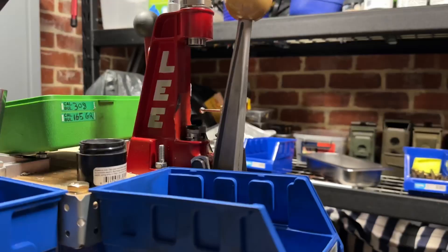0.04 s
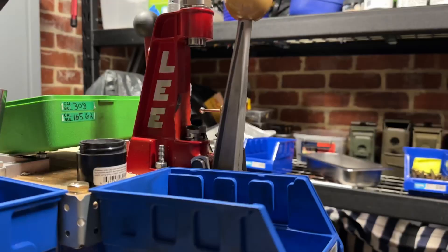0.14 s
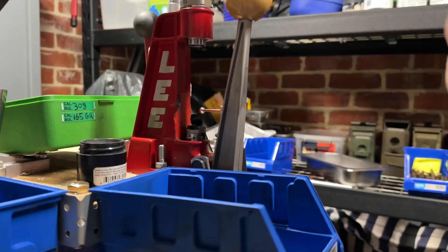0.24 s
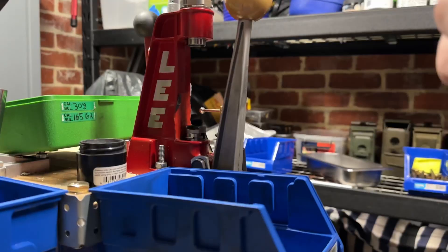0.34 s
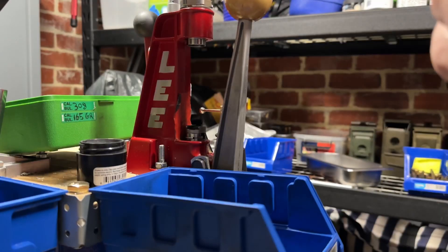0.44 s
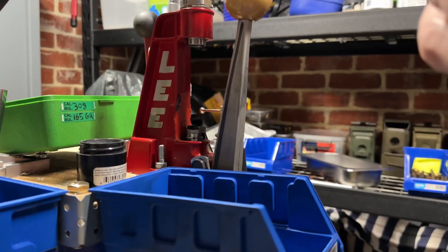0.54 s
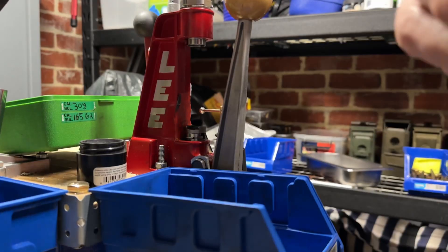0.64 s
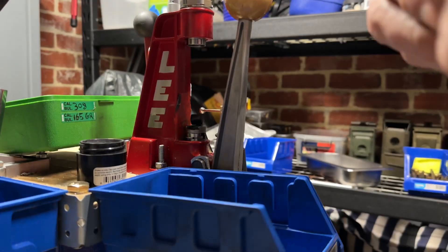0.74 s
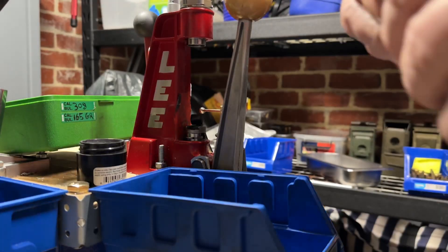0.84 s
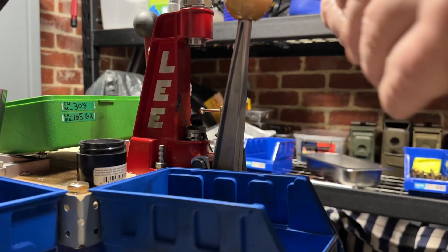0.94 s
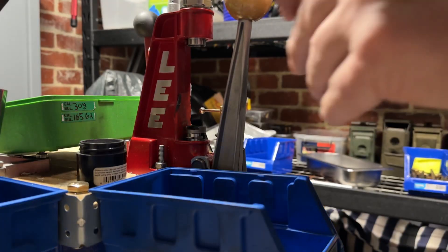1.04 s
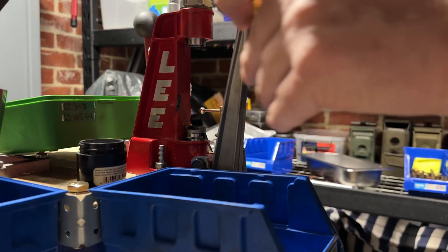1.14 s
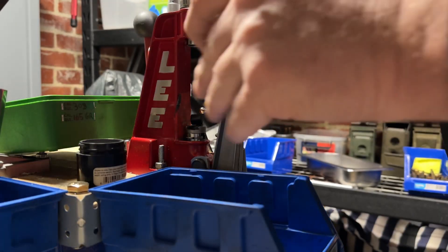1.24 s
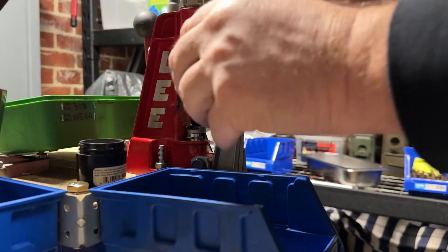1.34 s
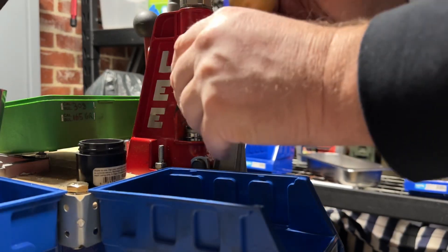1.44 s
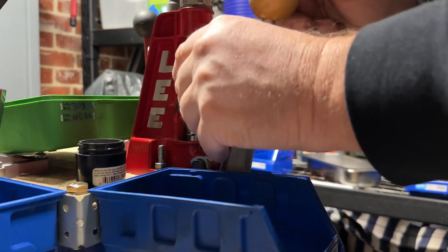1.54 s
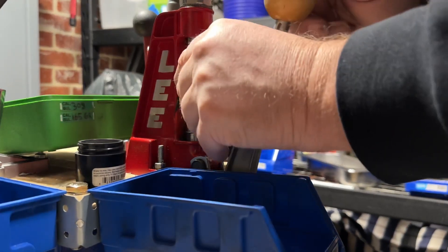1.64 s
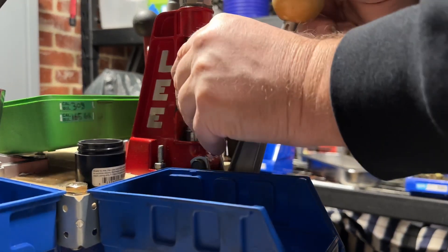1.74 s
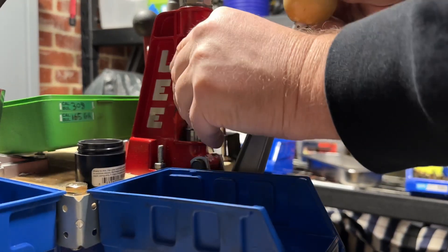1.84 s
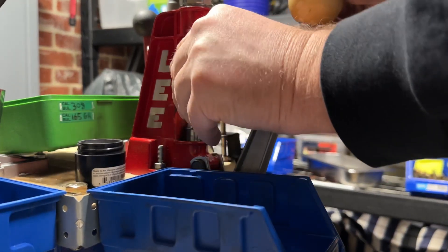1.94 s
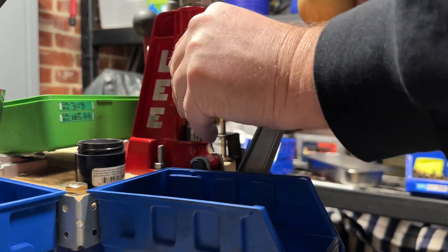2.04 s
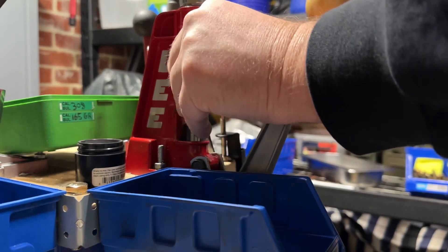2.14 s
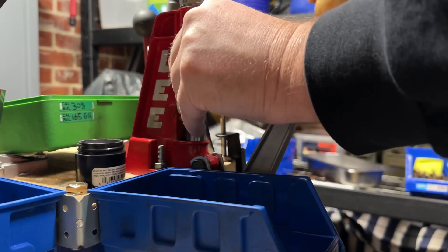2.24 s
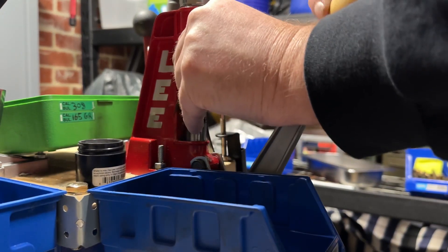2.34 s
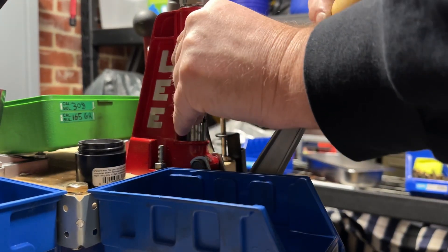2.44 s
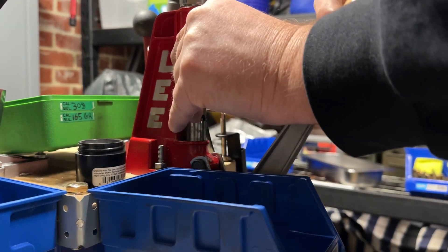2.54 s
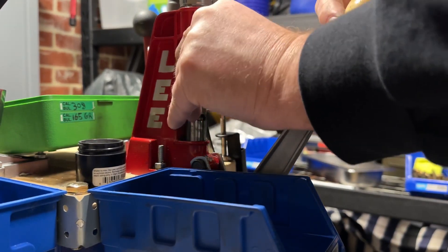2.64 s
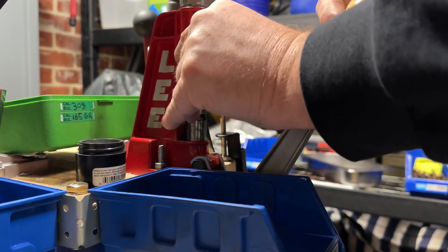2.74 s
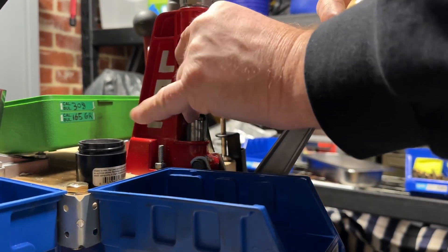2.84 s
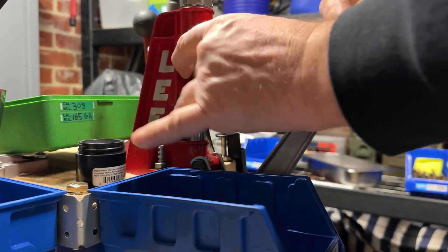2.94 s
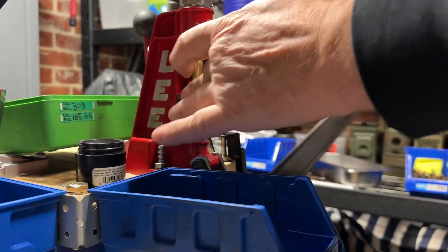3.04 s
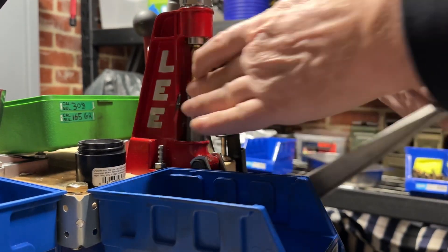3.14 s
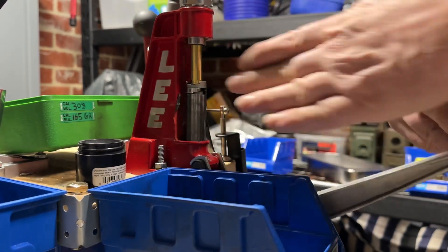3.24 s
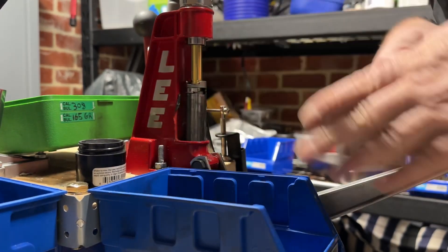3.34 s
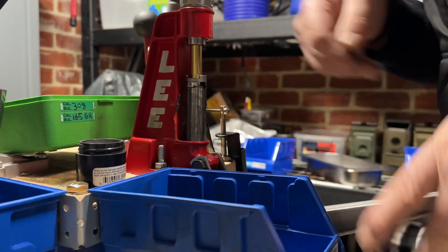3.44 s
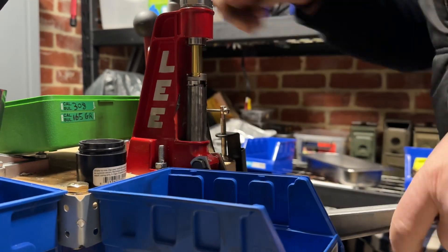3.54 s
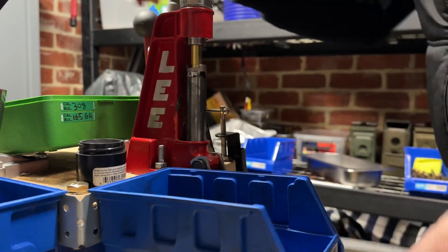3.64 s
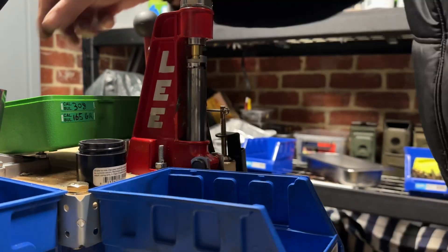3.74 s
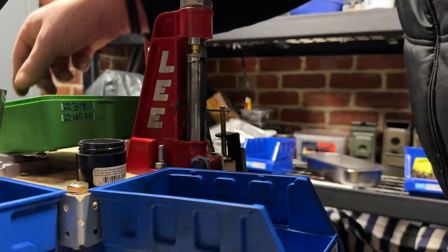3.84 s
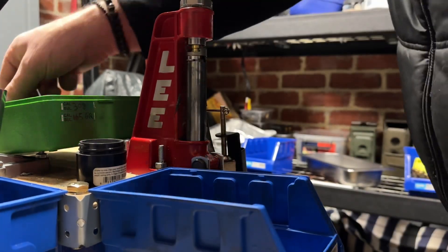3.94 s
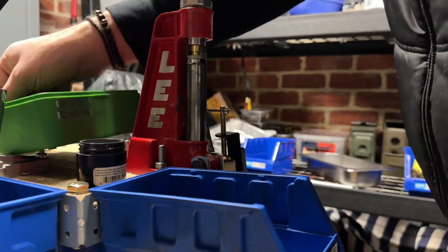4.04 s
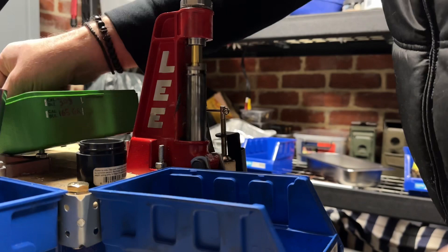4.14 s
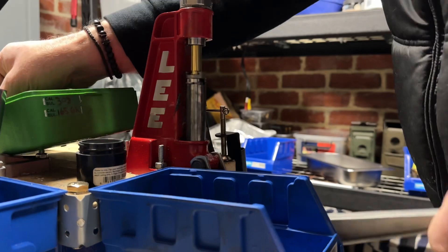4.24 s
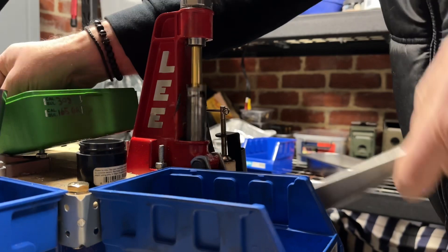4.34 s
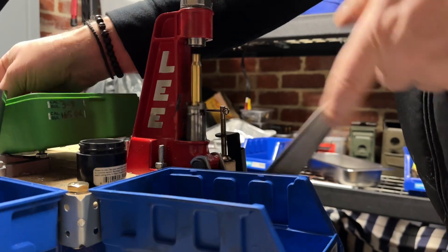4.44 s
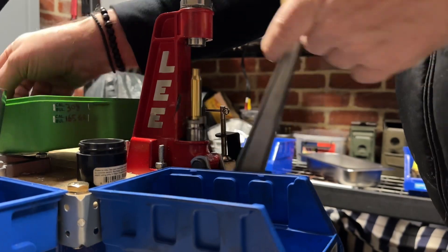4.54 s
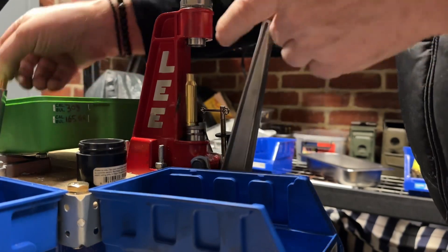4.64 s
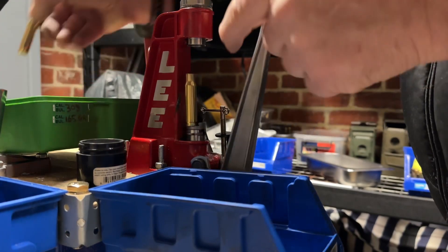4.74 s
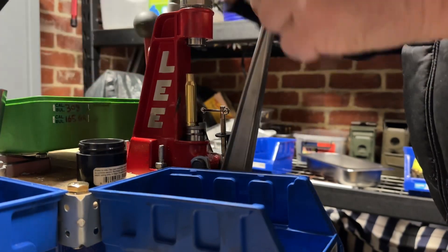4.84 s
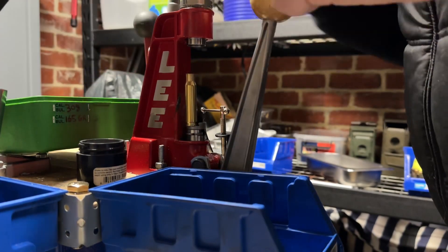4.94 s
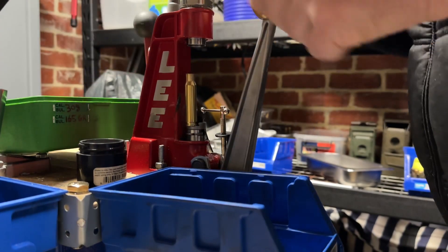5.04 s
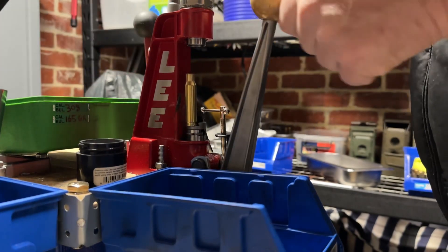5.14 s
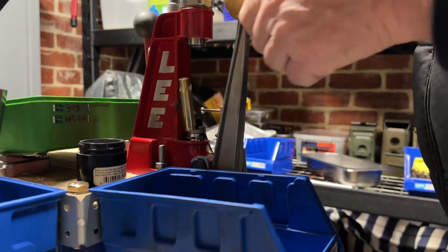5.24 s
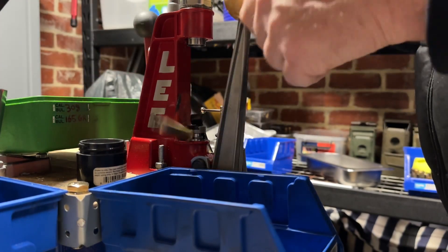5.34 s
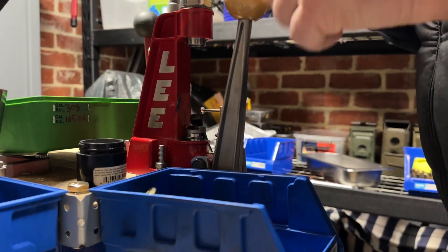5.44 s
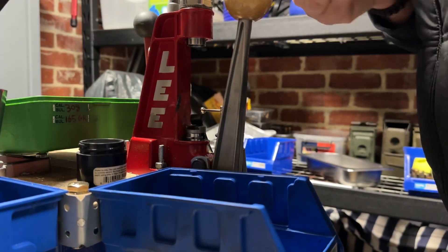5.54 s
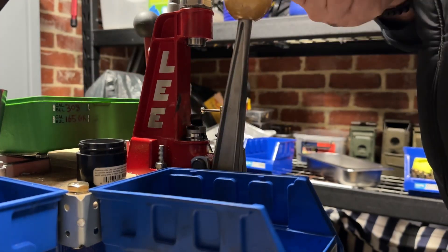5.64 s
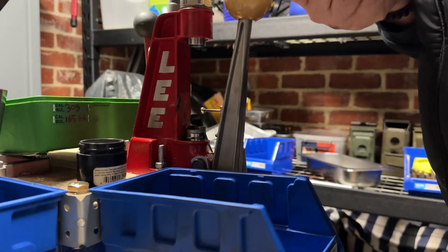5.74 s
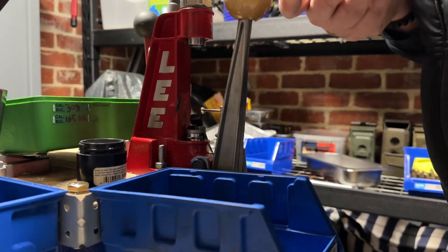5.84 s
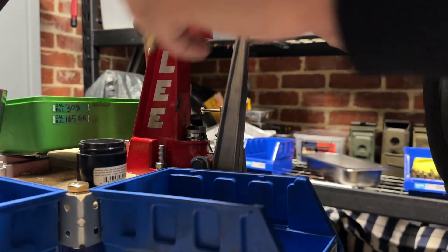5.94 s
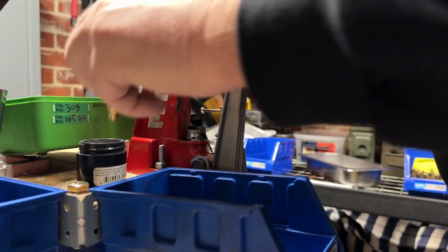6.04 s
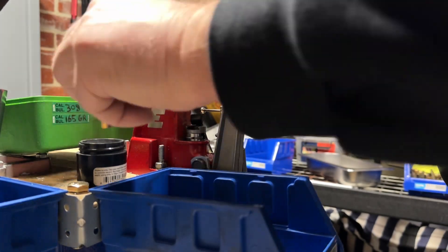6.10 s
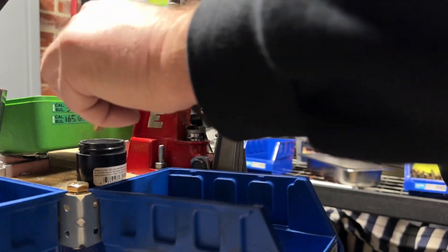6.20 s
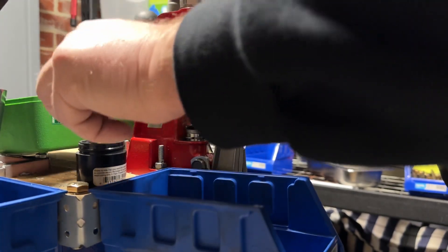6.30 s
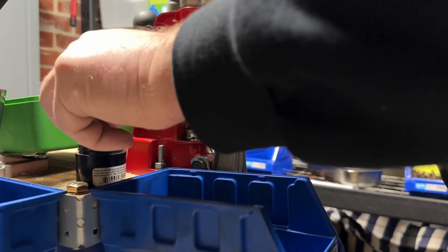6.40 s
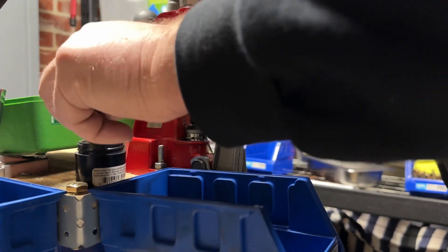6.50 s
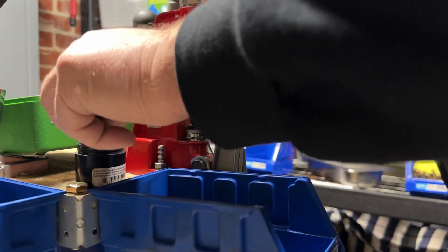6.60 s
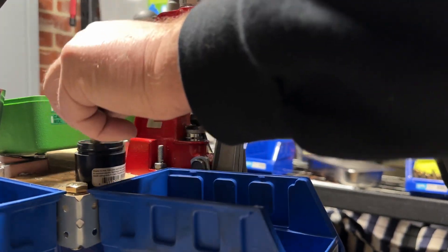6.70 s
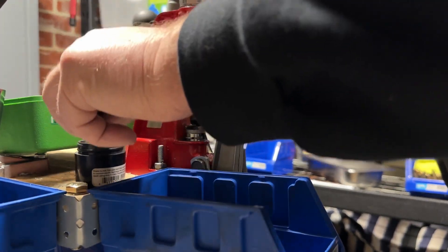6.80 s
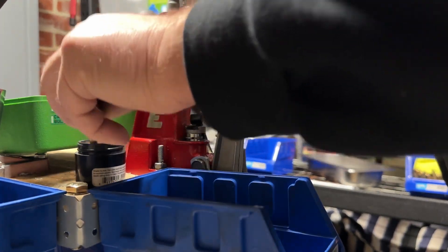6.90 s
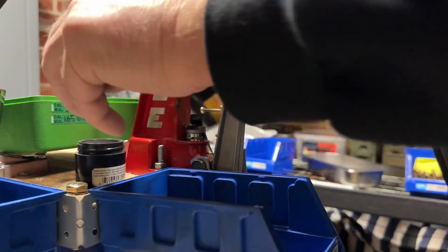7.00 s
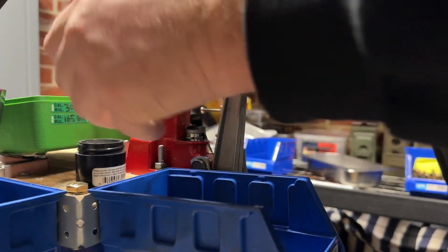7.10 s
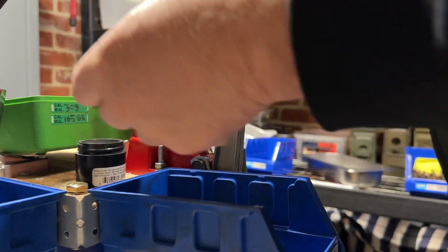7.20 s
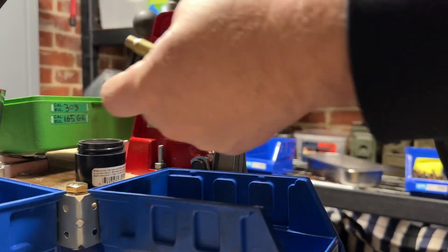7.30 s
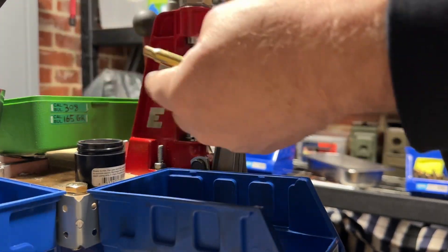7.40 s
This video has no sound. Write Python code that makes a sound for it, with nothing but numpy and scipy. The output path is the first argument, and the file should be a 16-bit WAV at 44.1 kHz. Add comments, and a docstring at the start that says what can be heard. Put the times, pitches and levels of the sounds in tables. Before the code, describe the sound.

A sleeve swishes, steel parts tick on a hand press, brass cases rattle in a tray, then one rings and bounces into a plastic bin.

```python
"""Work at a reloading press in a small brick workshop, heard close up over still air and a faint whine.
First a jacket swishes, from rubbed-fibre noise; then steel ticks, as noise bursts over ringing frame modes.
The ram groans as a narrow hum, a hand rummages in a tray of brass cases, and one case rings in beating pairs.
The lever hits its stop and rings, and the case bounces to rest in a plastic bin of swinging, ringing walls.
Softer handling and sleeve swishes follow."""
import sys
import numpy as np
from scipy import signal
from scipy.fft import rfft, irfft
from scipy.io import wavfile
from scipy.ndimage import uniform_filter1d

SR = 44100
rng = np.random.default_rng(int(sys.argv[2]) if len(sys.argv) > 2 else 0)


def master_out(mix):
    """Clip the mix to full scale and print it as 16-bit PCM to the path in sys.argv[1]."""
    frames = np.transpose(np.atleast_2d(mix))
    ceiling = np.clip(frames, -1, 1)
    pcm = np.round(ceiling * 32767).astype(np.int16)
    wavfile.write(sys.argv[1], SR, pcm)


N = 329102
T = np.arange(SR // 2) / SR  # time within one blow (s)
CLOCK = np.arange(N) / SR  # time through the scene (s)


def amp(db):
    """Decibels to gain."""
    return 10 ** (np.asarray(db) / 20)


def evened(x):
    """Scales to rms 1."""
    return x / np.sqrt(np.mean(x ** 2) + 1e-20)


def crested(x, size=176):
    """Scales the loudest few milliseconds to rms 1."""
    power = (x ** 2).mean(0)
    return x / np.sqrt(uniform_filter1d(power, size).max() + 1e-20)


def read(points, hz):
    """Reads a table on a log-frequency axis."""
    f, value = np.transpose(points)
    return np.interp(np.log(hz + 1), np.log(f + 1), value)


def add(mix, s, sound):
    """Adds a stereo sound at time s."""
    part = mix[:, max(round(s * SR), 0):][:, :sound.shape[1]]
    part += sound[:, :part.shape[1]]


def colour(x, spectrum, size=2048):
    """Causal (minimum-phase) filter with the given spectrum."""
    log_gain = np.log(amp(read(spectrum, abs(np.fft.fftfreq(size, 1 / SR)))))
    taps = np.fft.ifft(np.exp(np.conj(signal.hilbert(log_gain)))).real
    return signal.oaconvolve(x, taps[None], axes=1)[:, :x.shape[1]]


# likeness of diffuse sound at the two microphones: f/Hz, left-right correlation/1
STEREO_LIKENESS = [(50, 1), (150, 0.92), (400, 0.75), (900, 0), (2000, 0), (16000, 0.5)]


def diffuse(count):
    """White noise at two microphones, most alike in the bass."""
    a, b = rfft(rng.standard_normal((2, count)))
    same = np.clip(read(STEREO_LIKENESS, np.fft.rfftfreq(count, 1 / SR)), -1, 1)
    right = same * a + np.sqrt(1 - same ** 2) * b
    return irfft(np.array([a, right]), count)


def flutter(count, grain_db, size):
    """Gain that wanders at random, as contacts catch and let go."""
    return amp(grain_db * evened(uniform_filter1d(rng.standard_normal(count), size)))


def resonate_twice(x, hz, width):
    """Two equal resonances of peak gain 1 in a row, each of the given width in Hz."""
    b, a = signal.iirpeak(hz, hz / width, fs=SR)
    return signal.lfilter(b, a, signal.lfilter(b, a, x))


def burst(spectrum, t60, scatter, attack=.0002, chatter_db=4, size=30):
    """A brief chatter of contact: one shared wave plus scatter from things near by."""
    wave = rng.standard_normal(len(T)) + scatter * diffuse(len(T))
    wander = np.tanh(evened(uniform_filter1d(rng.standard_normal(len(T)), size)))
    chatter = amp(chatter_db * wander)
    onset = 1 - np.exp(-(T / max(attack, .0001)) ** 2)
    decay = amp(-60 * T / max(t60, .001))
    return colour(wave * chatter * onset * decay, spectrum)


def ring(modes, spread):
    """Decaying modes of a body; every blow excites them in another balance and phase."""
    hz, db, t60 = np.transpose(modes)[:, :, None]
    db = db + 2 * rng.standard_normal(db.shape)
    # spread: how far each mode's phase differs between the microphones (rad)
    phase = 2 * np.pi * rng.random(hz.shape) + spread * rng.standard_normal((2, *hz.shape))
    partials = amp(db - 60 * T / t60) * np.sin(2 * np.pi * hz * T + phase)
    return crested(partials.sum(1) * (1 - np.exp(-T / 0.0042)))


def focused(modes, hz, focus_db):
    """A blow favours the modes near its own pitch; the others lose focus_db an octave."""
    return [(f, db - focus_db * abs(np.log2(f / hz)), t60) for f, db, t60 in modes]


def flex(hz, rise, lag):
    """A panel swings for a few cycles, widest after rise seconds; the right hears it lag seconds early."""
    t = T + np.array([[0], [lag]])
    envelope = (t / rise) ** 2 * np.exp(-2 * t / rise)
    return crested(envelope * np.sin(2 * np.pi * hz * t))


def swell(s, rise, fall, shape=1.3):
    """A movement gathers speed until time s, then slows (shape 1 = pointed swell, 2 = bell)."""
    u = (CLOCK - s) / np.where(CLOCK < s, max(rise, .005), max(fall, .005))
    return np.exp(-np.minimum(abs(u), 10) ** shape)


# steel parts and fingers on the press:
# t/s, relative body level/dB, snap level/dB, strongest pitch f/Hz, body t60/s
PRESS_KNOCKS = [(1.272, -24.5, -49, 1207, 0.067), (1.297, -31.5, -44.5, 1050, 0.036),
                (1.659, -40.5, -46, 710, 0.13), (1.739, -33, -50, 1510, 0.03), (1.795, -45, -75, 1500, .02),
                (1.851, -42, -77, 1500, .03), (1.962, -32, -70, 1490, 0.022),
                (2.047, -42, -68, 1305, 0.084), (2.281, -28.5, -56, 720, 0.053),
                (2.298, -33, -47.5, 1150, 0.038), (2.54, -27.5, -44, 1450, 0.06),
                (2.615, -41, -80, 540, .06), (2.752, -48, -86, 515, 0.059),
                (3.101, -52, -46.5, 1960, 0.053), (3.15, -44, -38.5, 2950, 0.053),
                (3.576, -41, -52, 766, .06), (3.643, -32.5, -54, 680, 0.04),
                (3.909, -39.5, -71, 744, 0.023), (3.948, -36, -52, 1246, .02), (4.184, -41, -41, 430, .12),
                (4.347, -30, -44, 420, 0.022), (4.454, -29, -53.5, 1560, .025),
                (4.517, -22.5, -21, 2960, 0.035), (4.552, -23, -21, 2943, 0.08),
                (4.572, -32, -29, 2950, .09), (4.637, -28, -75, 1400, .02),
                (5.221, -26.5, -43, 1810, 0.023), (5.227, -17, -44, 650, 0.024),
                (6.025, -45, -66, 1030, 0.019), (6.085, -45.5, -78, 640, .025),
                (6.340, -39, -59, 410, .035), (6.549, -58, -67, 540, 0.025), (6.612, -52, -63, 640, 0.041),
                (6.659, -56.5, -85, 410, 0.05), (6.805, -48, -66.5, 491, 0.038),
                (6.824, -55, -69, 412, 0.044), (6.872, -59.5, -72, 452, 0.044)]
# spectrum of steel contact, also under sliding fingers: f/Hz, level/dB
STEEL_SPECTRUM = [(150, -16.5), (350, -9), (600, 1.5), (1200, -2), (1750, 0), (2800, -12), (5000, -16.5),
                  (9000, -39)]
# spectrum of the bright snap of any hard contact: f/Hz, level/dB
SNAP_SPECTRUM = [(1200, -25), (3000, 7.5), (4500, 1.5), (7000, 3.5), (10500, -7), (16000, -4)]
# ringing of the press frame: f/Hz, relative level/dB, t60/s
FRAME_MODES = [(402, -3, .3), (497, -3, .2), (707, 0, .2), (810, -6, .16), (1010, -4, .18), (1135, -4, .2),
               (1203, -2, .2), (1300, -6, .3), (1515, 0, .18), (1730, -2, .14), (1900, -4, .14)]
# side the hand works on: t/s, left minus right level/dB
HAND_SIDE = [(1.3, -4.5), (1.66, 0.5), (2.5, 0.5), (3.15, -1.5), (5.3, 0.5), (6.3, 3)]


def press_knocks(centre_hz, follow, attack, lag_per_db, body_db, lead_db, frame_db, snap_share, focus_db):
    """Steel parts meet: a bright snap, a short body, and frame modes ringing most near the blow's pitch."""
    out = np.zeros((2, N))
    for s, db, bright_db, hz, t60 in PRESS_KNOCKS:
        shifted = np.array(STEEL_SPECTRUM) * [(hz / centre_hz) ** follow, 1]
        body = crested(burst(shifted, t60, scatter=1.7, attack=attack))
        lead = amp(lead_db) * ring([(hz, 0, .035)], spread=0.46)
        frame = amp(frame_db) * ring(focused(FRAME_MODES, hz, focus_db), spread=0.86)
        snap = crested(burst(SNAP_SPECTRUM, t60 * snap_share, scatter=4, attack=attack / 2))
        left, right = amp(db + body_db) * (body + lead + frame) + amp(bright_db) * snap
        side_db = np.interp(s, *np.transpose(HAND_SIDE))
        # a hand on the left reaches the right microphone late
        right = np.roll(right, max(round(side_db * lag_per_db * SR), 0))
        add(out, s, np.array([left, right]) * amp([[side_db / 2], [-side_db / 2]]))
    return out


# fingers sliding over steel: middle t/s, level/dB, length/s
FINGER_RUBS = [(1.25, -44.5, 0.18), (1.946, -57, 0.06), (3.647, -53.5, 0.15), (6.61, -64, .1),
               (6.814, -64, 0.055)]


def fingers(grain_db, size=90):
    """Skin drags on the press in tiny slips, swelling and fading with each touch."""
    out = np.zeros((2, N))
    for s, db, length in FINGER_RUBS:
        count = int(max(length, .02) * SR)
        slips = diffuse(count) * flutter(count, grain_db, size)
        rub = evened(colour(slips, STEEL_SPECTRUM)) * np.hanning(count)
        add(out, s - length / 2, amp(db) * rub)
    return out


# ringing of the lever on its stop: f/Hz, relative level/dB, t60/s
LEVER_MODES = [(161, -12, .18), (388, -2, .15), (651, 0, .12), (780, -9, .17), (1136, -12, .17),
               (1303, -13, .26), (1384, -15, .16), (1750, -21, .22)]


def lever_stop(s, level_db):
    """The heavy lever lands on its stop at time s; it and the press sway and ring."""
    out = np.zeros((2, N))
    add(out, s, amp(level_db) * ring(LEVER_MODES, spread=0.27))
    return out


# the lever goes down, then back up: start t/s, length/s, relative level/dB
RAM_STROKES = [(3.46, 0.475, -44.5), (4.06, .54, -41)]
# the ram binds and shudders: t/s, level/dB
RAM_BINDS = [(3.491, -43.5), (3.682, -40), (4.23, -37.5), (4.356, -44)]


def ram(hum_db, hz, width, ease_s, bind_s):
    """Stick and slip of the loaded ram hums in the bench through each stroke and shudders where it binds."""
    slips = resonate_twice(diffuse(N), hz, width)
    load = np.zeros(N)
    for s, length, db in RAM_STROKES:
        # the load builds and lets go over ease_s
        edge = np.minimum(CLOCK - s, s + length - CLOCK) / ease_s
        load += amp(db) * np.clip(edge, 0, 1)
    binding = sum(amp(db) * swell(s, bind_s, bind_s) for s, db in RAM_BINDS)
    shudder = evened(np.sin(2 * np.pi * (hz * CLOCK + rng.random())))
    return amp(hum_db) * evened(slips) * load + shudder * binding


# the case landing in the bin: t/s, relative wall thock level/dB, wall pitch f/Hz, wall swing-up time/s,
# relative clack level/dB, clack pitch f/Hz
BOUNCES = [(5.4013, -2.5, 650, .0019, -14, 1500), (5.4372, -2.5, 833, 0.0012, -10.5, 2450),
           (5.4495, -7.5, 753, 0.0026, -17.5, 2530), (5.4893, 0.5, 920, 0.0014, -11.5, 1830),
           (5.541, -6.5, 783, 0.0026, -19, 1700), (5.5858, -6, 690, 0.0022, -20, 2400),
           (5.622, -18.5, 690, 0.0024, -29, 2120), (5.644, -18, 745, 0.0038, -27.5, 2020),
           (5.681, -13, 713, 0.0017, -28, 1690), (5.698, -15.5, 740, 0.0028, -35, 1320),
           (5.7195, -22, 850, 0.0022, -36, 1880), (5.739, -14.5, 744, 0.0027, -26.5, 2470),
           (5.7842, -12.5, 622, 0.0036, -31, 1650), (5.8, -16, 745, 0.0016, -31, 2400),
           (5.814, -19, 730, 0.004, -35, 1500), (5.833, -19.5, 710, 0.0023, -35.5, 1400)]
# spectrum of the case clacking on plastic: f/Hz, level/dB
CLACK_SPECTRUM = [(60, -48), (200, -24), (400, -22), (700, -6.5), (1050, 6), (1350, -8), (1700, -6.5),
                  (2000, -13), (2450, -10), (3200, -18.5), (5000, -21), (9000, -42)]
# ringing of the hollow bin: f/Hz, relative level/dB, t60/s
BIN_MODES = [(617, -3, .2), (662, -5, .17), (708, -3, .18), (778, 0, .19), (861, -6, .19), (932, -8, .19),
             (988, -7, .19), (1103, -8, .17), (1190, -14, .14), (1647, -22, .26)]
# ringing of the stiff bin floor: f/Hz, relative level/dB, t60/s
FLOOR_MODES = [(985, 3, 0.07), (945, 1, 0.13), (1105, 3, 0.13), (1200, 0, .07), (1640, -5, 0.13),
               (1900, -5, 0.06), (2460, -10, 0.06), (2600, -11, .06)]
# the bounces carry little bass: f/Hz, level/dB
BIN_BASS = [(70, -24), (220, 0), (16000, 0)]


def bin_bounces(thock_db, clack_db, pitch_db, floor_db, ring_db, snap_ahead, wall_delay, clack_rise):
    """Each landing snaps and clacks at its own pitch; then the plastic wall swings and the hollow bin rings."""
    out = np.zeros((2, N))
    for s, db, hz, rise, hard_db, clack_hz in BOUNCES:
        # a harder hit brings out the wall's second mode
        second = amp(db / 2 - 5) * flex(hz * 1.45, rise=rise * .75, lag=.0002)
        thock = flex(hz, rise=rise, lag=.0002) + second
        hollow = amp(ring_db) * ring(BIN_MODES, spread=0.14)
        add(out, s + wall_delay, amp(db) * (amp(thock_db) * thock + hollow))

        clack = crested(burst(CLACK_SPECTRUM, t60=.014, scatter=0.75, attack=0.00029))
        clack += amp(pitch_db) * flex(clack_hz, rise=clack_rise, lag=.0001)
        clack += amp(floor_db) * ring(FLOOR_MODES, spread=0.94)
        add(out, s, amp(hard_db + clack_db) * clack)

        # as the case slows, the snap dulls by 32.5 dB a second
        bright_db = hard_db - 4 - 32.5 * (s - BOUNCES[0][0])
        add(out, s - snap_ahead, amp(bright_db) * crested(burst(SNAP_SPECTRUM, t60=0.016, scatter=11.0)))
    return colour(out, BIN_BASS) * amp([[-.4], [.4]])


# cases shoved about in the tray: t/s, relative level/dB, strongest pitch f/Hz
TRAY_KNOCKS = [(4.010, -34, 1560), (4.0178, -18, 2600), (4.0206, -15.5, 2350), (4.030, -29, 1700),
               (4.043, -26, 1430), (4.052, -29, 1500), (4.0625, -21, 2158), (4.0655, -21, 2395),
               (4.073, -28, 1800), (4.084, -23, 1991), (4.0895, -19.5, 1543), (4.098, -27, 1650),
               (4.118, -28, 1400), (4.1232, -14.5, 1950), (4.141, -17.5, 1500), (4.149, -22, 1586),
               (4.154, -22.5, 1900), (4.183, -25, 800), (4.189, -21, 773), (4.200, -20, 800),
               (4.212, -26.5, 1103), (4.261, -36, 1560)]
# spectrum of the gritty edge: f/Hz, level/dB
TRAY_SPECTRUM = [(200, -7), (500, -5), (1100, 1), (1600, 1), (2600, 0), (3800, -19), (8000, -32)]
# ringing of the tray floor and neighbouring cases: f/Hz, relative level/dB, t60/s
TRAY_MODES = [(420, 3, .1), (720, -1, .08), (933, -5, .07), (1226, -2, .07), (1475, 0, .09), (1635, 1, .12),
              (1790, -2, .08), (2410, -2, .05), (2560, -5, .05)]


def tray(level_db, grit_db, ring_db, snap_db, follow, t60):
    """Each case kicks the tray floor for a few cycles, with grit; floor and neighbouring cases ring briefly."""
    out = np.zeros((2, N))
    for s, db, hz in TRAY_KNOCKS:
        kick = flex(hz, rise=1.6 / hz, lag=.0001)
        shifted = np.array(TRAY_SPECTRUM) * [(hz / 1660) ** follow, 1]
        grit = crested(burst(shifted, t60, scatter=.8, attack=.001))
        snap = crested(burst(SNAP_SPECTRUM, t60, scatter=4))
        clink = ring(focused(TRAY_MODES, hz, focus_db=13), spread=.77)
        body = kick + amp(grit_db) * grit + amp(ring_db) * clink
        add(out, s, amp(db) * (amp(level_db) * body + amp(snap_db) * snap))
    return out * amp([[1], [-1]])


# blows that set brass ringing:
# t/s, lowest shell mode level/dB, highest shell mode level/dB, damping/factor that shortens t60
CLINKS = [(1.661, -72, -57, 2), (1.738, -72, -59, 2), (4.188, -66, -36, 2.5), (4.517, -30, -38, 6),
          (4.553, -10, -25, 1), (5.228, -54, -37, 2), (5.403, -44, -33, 2), (5.440, -29, -27, 2),
          (5.454, -23, -21, 3), (5.541, -25, -13.5, 1.3), (5.590, -26, -27, 1.3), (5.712, -56, -39, 1)]
# shell modes of the case mouth, lowest to highest: f/Hz
BRASS_HZ = [10180, 13210, 14775]
# each shell mode is a close pair: split f/Hz, relative twin level/dB, undamped t60/s, phase between mics/rad
BRASS_PAIRS = [(11, -17, .41, 1.35), (9, -10, .33, 2.5), (30, -8, .23, 1.8)]


def brass(middle_db, tumble_hz, tumble_depth):
    """The thin case mouth rings in beating pairs; a finger or the bin damps it, and tumbling makes it waver."""
    out = np.zeros((2, N))
    for s, low_db, high_db, damping in CLINKS:
        levels = low_db, low_db + middle_db, high_db
        depth = tumble_depth * (s > BOUNCES[0][0])  # only once loose in the bin
        for db, hz, (split, twin_db, t60, mic_phase) in zip(levels, BRASS_HZ, BRASS_PAIRS):
            turn = 2 * np.pi * (hz * T + rng.random()) + np.array([[0], [mic_phase]])
            pair = np.sin(turn) + amp(twin_db) * np.sin(turn + 2 * np.pi * split * T)
            waver_hz = tumble_hz * rng.uniform(0.56, 2.1)
            facing = 1 + depth * np.sin(2 * np.pi * waver_hz * T)
            decay = amp(db - 60 * T * damping / t60)
            add(out, s, decay * pair * facing * (1 - np.exp(-T / 0.00015)))
    return out


# the case rim scrapes on fingers, steel or plastic: middle t/s, relative level/dB, length/s
RIM_SCRAPES = [(1.289, -48.5, 0.12), (2.3, -64, 0.061), (4.197, -59, 0.06), (5.249, -56, 0.029),
               (5.411, -47, 0.043), (5.473, -28, 0.053), (6.34, -64, 0.09), (6.611, -66, 0.094),
               (6.811, -63, 0.073)]


def rim_scrapes(width_hz, high_db):
    """Dragging the rim keeps the lowest and highest shell modes hissing."""
    touch = np.zeros(N)
    for s, db, length in RIM_SCRAPES:
        place = np.clip((CLOCK - s) / max(length, .01), -.5, .5)
        touch += amp(db) * np.cos(np.pi * place) ** 2
    low, high = (evened(resonate_twice(diffuse(N), hz, width_hz)) for hz in BRASS_HZ[::2])
    return touch * evened(low + amp(high_db) * high)


# dull bumps through the bench: t/s, relative level/dB, pitch f/Hz
BENCH_THUDS = [(0.112, -54, 245), (0.692, -41, 130), (0.77, -37, 325), (1.274, -37.5, 246),
               (1.303, -40, 253), (2.621, -46, 129), (4.044, -31, 328), (4.127, -32.5, 187),
               (4.185, -27, 165), (4.347, -26.5, 105), (5.228, -29, 352), (5.239, -27.5, 163)]


def bench(level_db, rattle_db):
    """The bench top gives for a cycle or two and shakes what stands on it."""
    spectrum = [(40, -26.5), (100, -5.5), (180, 3), (300, 4), (700, -16.5), (2000, -44.0)]  # f/Hz, level/dB
    out = np.zeros((2, N))
    for s, db, hz in BENCH_THUDS:
        rattle = crested(burst(spectrum, t60=0.096, scatter=0.25))
        thud = flex(hz, rise=1.0 / hz, lag=0) + amp(rattle_db) * rattle
        add(out, s, amp(db + level_db) * thud)
    return out


# arm movements that slide the jacket sleeve:
# t of greatest speed/s, relative level/dB, speeding up/s, slowing down/s
ARM_STROKES = [(.36, -60, 0.16, .15), (.59, -47, 0.11, .25), (1.28, -56.5, 0.22, .2),
               (1.98, -66.5, 0.15, .25), (2.7, -66, 0.25, .1), (3.282, -52, 0.15, .19),
               (3.68, -53.5, 0.13, .22), (4.36, -49, 0.13, .15), (4.56, -41, 0.028, .06),
               (4.95, -64.5, .3, .25), (5.22, -62, 0.12, .07), (5.95, -57.5, 0.14, .13),
               (6.25, -71.5, .12, .13), (7.24, -68, 0.14, .22)]
# spectrum of rubbed cloth: f/Hz, level/dB
CLOTH_SPECTRUM = [(40, -14), (130, -12.5), (400, -10.5), (750, -2.5), (1200, -3.5), (1700, -3.5),
                  (3000, -7.5), (6200, -9), (8500, -21), (15500, -23)]


def jacket(level_db, fizz_db, grain_db, size=60):
    """Countless fibres catch and let go as the sleeve slides; fast strokes add a fine fizz."""
    fizz_spectrum = [(4000, -25), (9000, -12), (10200, 2), (13000, -9), (15000, -2)]  # f/Hz, level/dB
    catches = flutter(N, grain_db, size)
    speed = np.sqrt(sum((amp(db) * swell(s, rise, fall)) ** 2 for s, db, rise, fall in ARM_STROKES))
    haste = speed / speed.max()
    direct = rng.standard_normal(N)
    right_leads = 18  # samples
    fibres = (diffuse(N) + 0.64 * np.array([np.roll(direct, right_leads), direct])) * catches
    rub = amp(level_db) * evened(colour(fibres, CLOTH_SPECTRUM))
    fizz = amp(fizz_db) * evened(colour(diffuse(N) * catches, fizz_spectrum)) * np.sqrt(haste)
    return (rub + fizz) * speed * amp([[-1.9], [1.9]])


# sleeve rubbing hard across the jacket:
# t of greatest speed/s, level/dB, speeding up/s, slowing down/s, pitch at full speed f/Hz
SLEEVE_ZIPS = [(.585, -49.5, .065, .17, 1853), (3.251, -69, .12, .15, 2210)]


def zips(width_hz, glide, grain_db, size=150):
    """Ribs of the weave tick past each other: a rough rasp whose pitch rises with the speed of the arm."""
    out = np.zeros((2, N))
    r = np.exp(-np.pi * width_hz / SR)
    for s, db, rise, fall, hz in SLEEVE_ZIPS:
        speed = swell(s, rise, fall)
        pitch = hz * (1 - glide * (1 - speed))
        turn = np.exp(2j * np.pi * np.cumsum(pitch) / SR)
        # smooth complex noise, carried up to the gliding pitch
        rasp = signal.lfilter([1], [1, -2 * r, r * r], diffuse(N) + 1j * diffuse(N))
        out += amp(db) * speed * evened((rasp * turn).real * flutter(N, grain_db, size))
    return out * amp([[-2], [2]])


# spectrum of the still air: f/Hz, level/dB
AIR_SPECTRUM = [(20, -16), (55, 0), (200, -8), (600, -9.5), (1600, -11), (3000, -21), (8000, -29),
                (16000, -31)]


def workshop(air_db, whine_db, whine_hz):
    """Still air as shaped noise, with a faint narrow whine of resonated noise."""
    air = evened(colour(diffuse(N), AIR_SPECTRUM))
    whine = evened(resonate_twice(diffuse(N), whine_hz, 70))
    return amp(air_db) * air + amp(whine_db) * whine


# decay of the workshop: f/Hz, t60/s
ROOM_DECAY = [(100, 0.43), (400, 0.18), (1000, 0.18), (3000, 0.24), (7000, 0.22), (12000, 0.1)]


def room(x, early_db, tail_db):
    """Quick scatter from the cluttered bench, then the tail of the workshop, decaying by frequency."""
    hz, t, z = signal.stft(diffuse(len(T)), SR, nperseg=256)
    decay = amp(-60 * t / read(ROOM_DECAY, hz)[:, None])
    tail = signal.istft(z * decay, SR, nperseg=256)[1][:, :len(T)]
    tail *= np.clip((T - .004) / 0.0075, 0, 1)
    early = diffuse(len(T)) * (T > .002) * amp(-60 * T / 0.047)
    echoes = (amp(early_db) * evened(early) + amp(tail_db) * evened(tail)) / np.sqrt(len(T))
    return x + signal.oaconvolve(x, echoes, axes=1)[:, :N]


def scene():
    """Everything on the bench, each thing with its share of the room; ram, cloth and air stay dry."""
    press = press_knocks(centre_hz=950, follow=0.25, attack=0.0007, lag_per_db=.00004, body_db=-11.0,
                         lead_db=-3, frame_db=-7, snap_share=0.32, focus_db=3.5)
    mix = room(press + fingers(grain_db=11), early_db=-3.0, tail_db=-3.0)
    mix += room(lever_stop(s=5.225, level_db=-28.5), early_db=-11.5, tail_db=-13.5)
    mix += ram(hum_db=-14, hz=102, width=14, ease_s=.04, bind_s=0.01)

    bounces = bin_bounces(thock_db=-6.5, clack_db=-0.5, pitch_db=-3.5, floor_db=-12.5, ring_db=-25,
                          snap_ahead=.0001, wall_delay=.002, clack_rise=0.00064)
    mix += room(bounces, early_db=-10, tail_db=-7.0)
    rummage = tray(level_db=-6.5, grit_db=-3, ring_db=-10, snap_db=-37, follow=0.7, t60=.014)
    mix += room(rummage, early_db=-13, tail_db=-8)
    case = brass(middle_db=-14, tumble_hz=32.2, tumble_depth=0.5) + rim_scrapes(width_hz=300, high_db=3.5)
    mix += room(case, early_db=-20.0, tail_db=-23.0)

    mix += room(bench(level_db=-10.5, rattle_db=1.0), early_db=-12.0, tail_db=-9.0)
    mix += jacket(level_db=5.0, fizz_db=-8, grain_db=1.5)
    mix += zips(width_hz=470, glide=0.33, grain_db=2.5)
    return mix + workshop(air_db=-72.5, whine_db=-81, whine_hz=1688)


def record(dry):
    """The microphones lose the deepest bass, the loudest peaks are rounded off, then the band limit."""
    lean = signal.sosfilt(signal.butter(3, 48, "highpass", fs=SR, output="sos"), dry)
    rounded = lean / (1 + (lean / .88) ** 8) ** (1 / 8)
    edge_hz = 16300
    lowpass = signal.firwin(511, edge_hz, window=("kaiser", 9), fs=SR)
    return signal.oaconvolve(rounded, lowpass[None], "same")


dry = scene()
out = record(dry)
master_out(out)
```